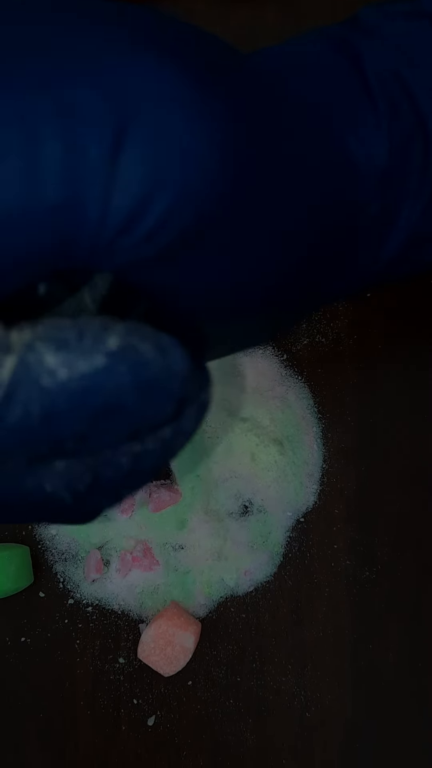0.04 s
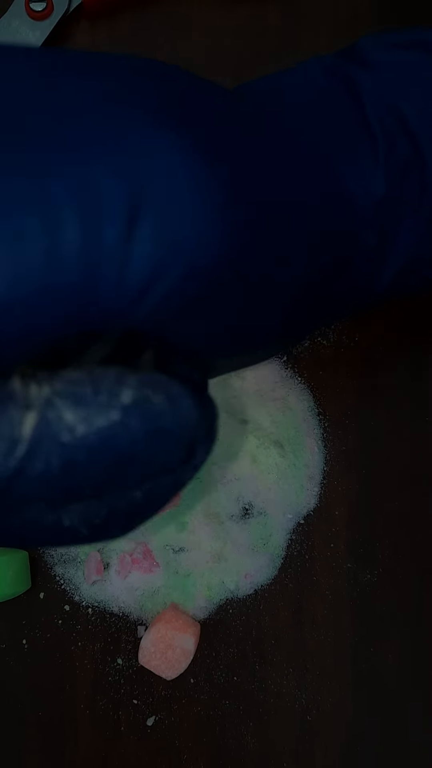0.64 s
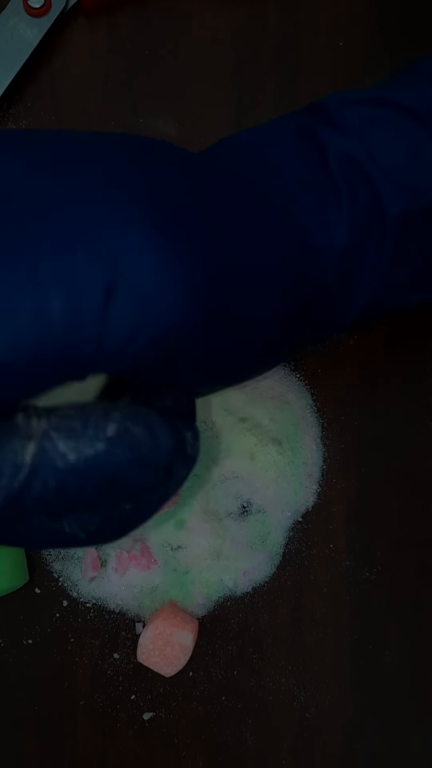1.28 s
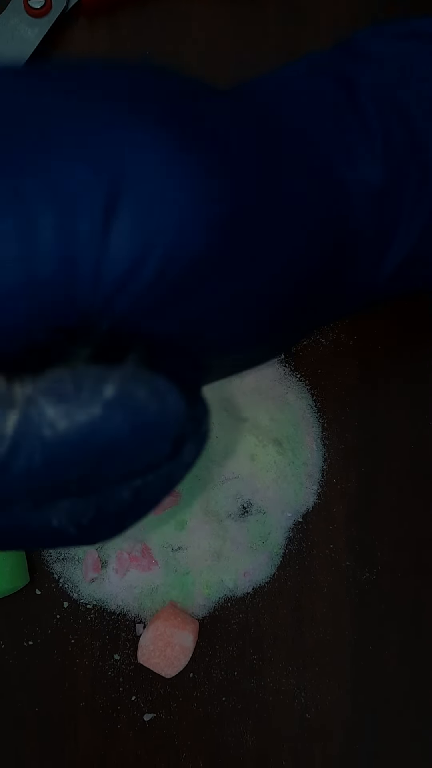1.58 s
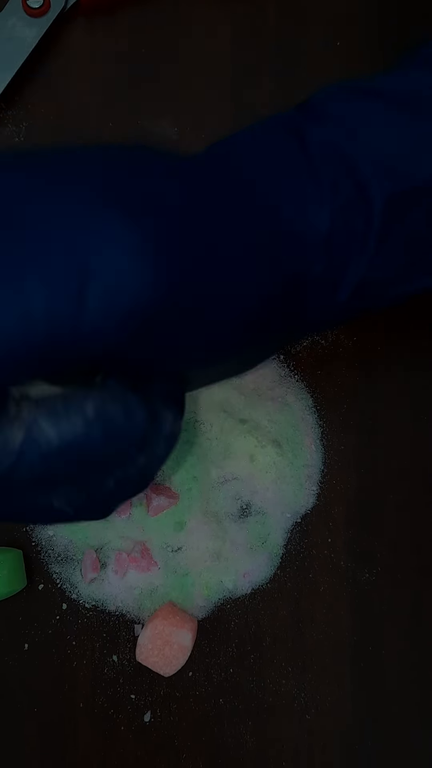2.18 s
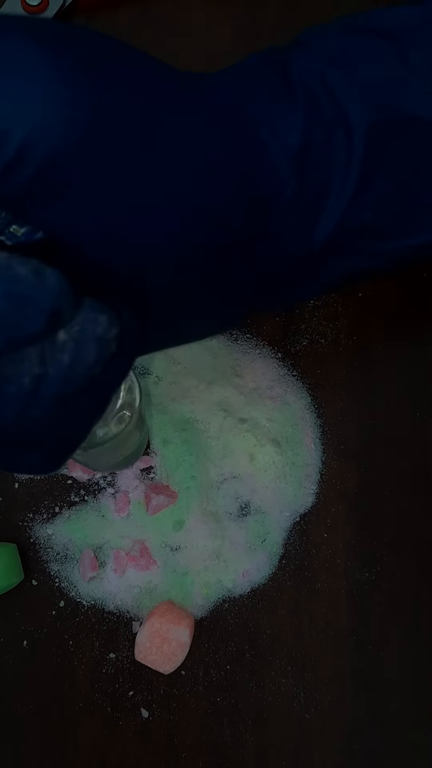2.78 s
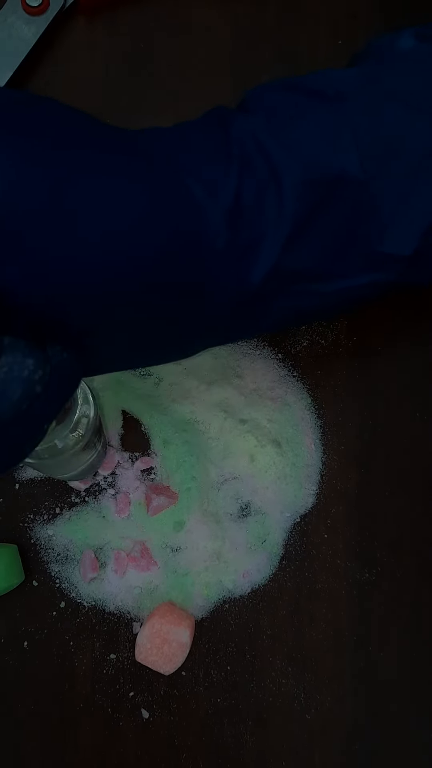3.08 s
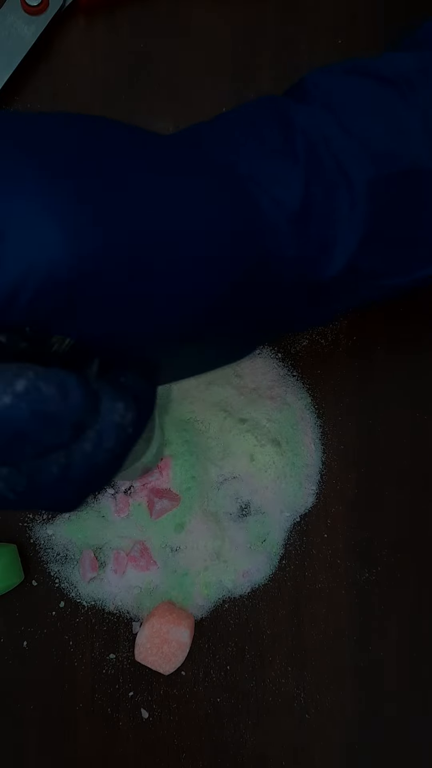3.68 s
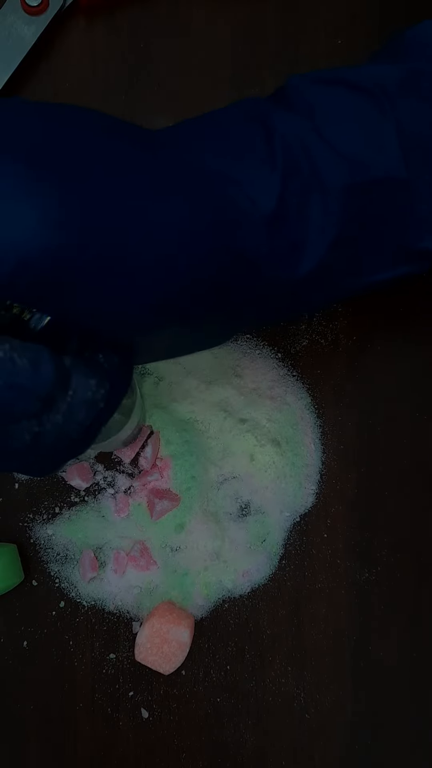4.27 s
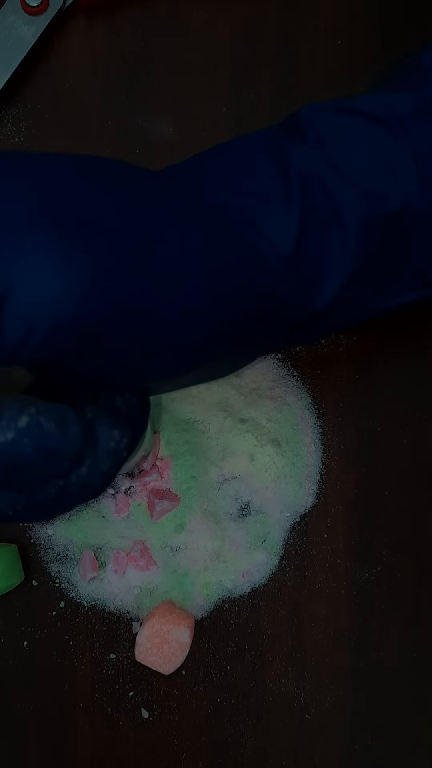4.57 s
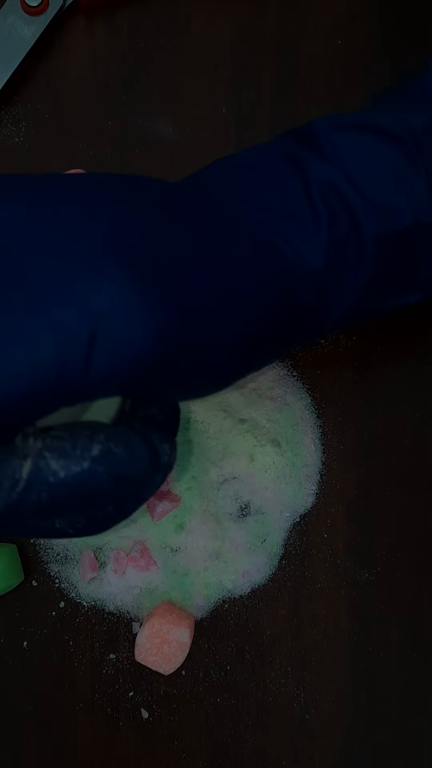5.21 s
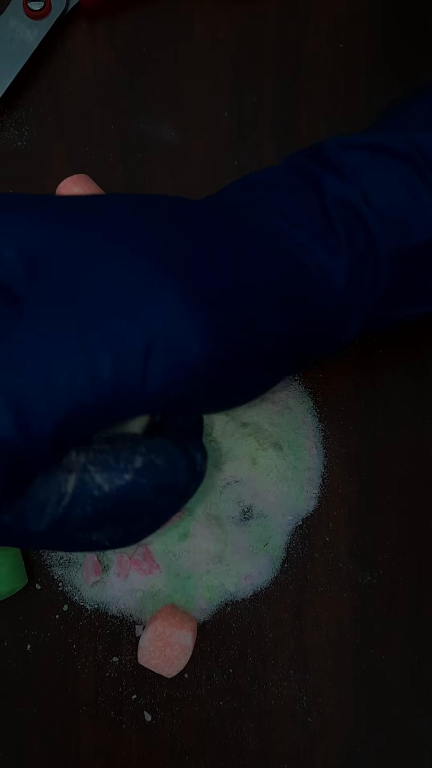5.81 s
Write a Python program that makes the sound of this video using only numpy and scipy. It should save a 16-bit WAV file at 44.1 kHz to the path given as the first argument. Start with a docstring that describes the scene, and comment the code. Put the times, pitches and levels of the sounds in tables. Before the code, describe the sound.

A small glass bottle pounds mothballs on a wooden table four times, then presses gently through the powder with soft grinding clicks.

```python
"""A small glass bottle, held in a gloved hand, pounds mothballs on a wooden table, close by.
Four hard blows clack and boom through the table top, each followed by rocking taps and snapping crumbs.
Then the glass is pressed gently through the powder five times, grinding and clicking on the wood.
The glove ticks on the bottle. A small room answers, over faint hiss and rumble."""
import sys
import numpy as np
from scipy import signal
from scipy.fft import rfft, irfft, next_fast_len
from scipy.io import wavfile
from scipy.ndimage import map_coordinates

SR = 44100
rng = np.random.default_rng(int(sys.argv[2]) if len(sys.argv) > 2 else 0)


def store_wav(level_fs):
    """Save 16-bit WAV to argv[1]."""
    pcm = np.round(np.clip(np.atleast_2d(level_fs), -1, 1) * 32767)
    wavfile.write(sys.argv[1], SR, pcm.T.astype(np.int16))


N = 257984


def amp(db):
    """Decibels to gain."""
    return 10 ** (np.asarray(db) / 20)


def unit(x):
    """Scale to rms 1."""
    return x / np.sqrt(np.mean(x ** 2) + 1e-20)


def along(points, hz):
    """Read (Hz, value) points on a log axis."""
    point_hz, values = np.transpose(points)
    return np.interp(np.log(hz + 1), np.log(point_hz + 1), values)


def pan(db):
    """Stereo gains for a left-over-right level."""
    return amp(np.array([[db], [-db]]) / 2)


def add(track, start_s, sound):
    """Mix a sound into a track."""
    start = max(round(start_s * SR), 0)
    part = sound[..., :N - start]
    track[..., start:start + part.shape[-1]] += part


def filtered(x, gain):
    """Apply a gain that depends on frequency."""
    n = x.shape[-1]
    size = next_fast_len(n + 2048)
    return irfft(rfft(x, size) * gain(np.fft.rfftfreq(size, 1 / SR)), size)[..., :n]


def coloured(x, points):
    """Zero-phase filter through (Hz, dB) points."""
    return filtered(x, lambda hz: amp(along(points, hz)))


def causal(x, points):
    """Minimum-phase filter through (Hz, dB) points: no sound ahead of the attack."""
    size = next_fast_len(x.shape[-1], real=True)
    gain = amp(along(points, np.fft.rfftfreq(size, 1 / SR)))
    cepstrum = irfft(np.log(gain), size)
    cepstrum[1:size // 2] *= 2
    cepstrum[size // 2 + 1:] = 0
    return irfft(rfft(x, size) * np.exp(rfft(cepstrum)), size)


def wobble(knots_per_s):
    """A smooth random curve."""
    return map_coordinates(rng.standard_normal(256), [np.arange(N) * knots_per_s / SR], mode="wrap")


# Diffuse field. Each row: frequency in Hz, left-right correlation.
COHERENCE = [(100, 0.92), (350, 0.72), (800, 0.23), (1800, 0), (5000, 0.016)]

def diffuse(size):
    """White stereo noise, alike in the bass and unrelated in the treble."""
    def mid_side_gains(hz):
        angle = np.arccos(along(COHERENCE, hz)) / 2
        return np.array([np.cos(angle), np.sin(angle)])
    mid, side = filtered(rng.standard_normal((2, size)), mid_side_gains)
    return np.array([mid + side, mid - side])


# Noise spectra. Each row: frequency in Hz, relative density in dB.
HISS_SPECTRUM = [(60, -14.5), (130, -8), (300, -4), (500, -7), (800, -1.5), (1300, -4), (2300, -4.5),
                 (4000, -10.5), (8000, -14), (10000, -14), (11600, -8), (14000, -13.5), (16000, -19)]
RUMBLE_SPECTRUM = [(20, -21.5), (40, -3.5), (58, -1.5), (80, -4.5), (108, -0.5), (150, -19), (300, -41)]
# Hiss drift. Each row: time in seconds, level in dB.
HISS_DRIFT = [(0, -61.5), (0.95, -64), (1.5, -62), (2.8, -65), (3.5, -64.5), (4.05, -61), (5.85, -62)]

def background(rumble_db=-72.5, swing_db=2, weight_db=-7.5, lag_s=0.026, width_s=0.036):
    """Drifting hiss over a restless rumble that swells under the arm's weight at each press."""
    t = np.arange(N) / SR
    hiss_db = np.interp(t, *np.transpose(HISS_DRIFT)) + 0.24
    restless = amp(rumble_db + swing_db * wobble(knots_per_s=2.5))
    weight = sum(amp(db + thump_db + weight_db) * np.exp(-((t - s - lag_s) / width_s) ** 2)
                 for s, db, thump_db, *_ in PRESSES)
    hiss = pan(1.5) * unit(coloured(diffuse(N), HISS_SPECTRUM))
    rumble = pan(6.5) * unit(coloured(diffuse(N), RUMBLE_SPECTRUM))
    return amp(hiss_db) * hiss + (restless + weight) * rumble


# Reverb colour. Each row: frequency in Hz, gain in dB.
ROOM_SPECTRUM = [(45, -12.5), (100, 5), (220, 7), (330, 3), (480, 4.5), (750, 0.5), (1150, -8), (1700, 3),
                 (2600, -2.5), (4000, -1.5), (7000, -4.5), (14000, -7)]
# Reverb decay. Each row: frequency in Hz, t60 in seconds.
ROOM_T60 = [(100, 0.32), (500, 0.36), (1500, 0.25), (4000, 0.3), (12000, 0.28)]

def room(x, gain_db=-0.5, near_db=4.5, wall_s=0.021, wall_db=5):
    """Nearby things scatter first; the walls answer a little later and die away."""
    out, size, step = np.zeros((2, N)), SR // 2, SR // 3
    t = np.arange(size) / SR
    scatter = amp(near_db) * np.minimum(t / 0.0016, 1)
    answer = 1 + amp(wall_db - 60 * np.abs(t - wall_s) / 0.067) / 2
    swell = np.where(t < wall_s, scatter, answer)
    for start in range(0, N, step):  # a fresh tail per block
        hz, frame_s, spectra = signal.stft(diffuse(size), SR, nperseg=256)
        decay = amp(-60 * frame_s / along(ROOM_T60, hz)[:, None])
        tail = signal.istft(spectra * decay, SR, nperseg=256)[1][:, :size] * swell
        tail = coloured(tail / np.linalg.norm(tail[0]), ROOM_SPECTRUM)
        add(out, start / SR, signal.fftconvolve(x[:, start:start + step], tail, axes=1))
    return amp(gain_db) * out


# Early reflections. Each row: delay in seconds, gain in dB.
WALL_ECHOES = [(0.018, -13), (0.027, -18)]
# Their colour. Each row: frequency in Hz, gain in dB.
WALL_SPECTRUM = [(90, -4.5), (200, 1), (400, 0), (1100, -8), (2000, -3), (8000, -9)]

def walls(x):
    """The nearest walls send back duller copies."""
    out = np.zeros((2, N))
    for delay_s, db in WALL_ECHOES:
        add(out, delay_s, amp(db) * x)
    return causal(np.pad(out, ((0, 0), (0, SR // 8))), WALL_SPECTRUM)[:, :N]


# Shifts of grip. Each row: start in seconds, level in dB.
GRIP_SHIFTS = [(0.027, -46.5), (0.146, -43.5), (0.578, -44.5), (0.584, -49.5), (0.606, -44.5), (0.672, -44),
               (1.655, -44), (1.985, -46.5), (2.633, -43.5), (4.214, -46.5)]

def glove(start_s=0.02, end_s=4.7, faint_db=-56, spread_db=2, count=16):
    """The glove ticks on the bottle: a few clear shifts of grip among many faint ones."""
    out = np.zeros((2, N))
    faint = [(start_s + (end_s - start_s) * (k + place) / count, faint_db + spread_db * (2 * size - 1))
             for k, (place, size) in enumerate(rng.random((count, 2)))]
    for s, db in GRIP_SHIFTS + faint:
        add(out, s, amp(db) * causal(clack(), [(450, 2), (1050, 2.5), (1700, 6.5), (3000, -4)]))
    return out


def grains(length_s, rate_per_s, spread_db):
    """A swell of tiny breaks of uneven size, rms 1."""
    size = round(length_s * SR)
    breaks = rng.random(SR // 4)[:size] < rate_per_s / SR
    strength = amp(spread_db * rng.standard_normal(SR // 4)[:size])
    sign = rng.choice([-1, 1], SR // 4)[:size]
    return unit(breaks * sign * strength * signal.windows.tukey(size, 0.5))


def grind(body, length_s):
    """Uneven little breaks drive a body's impulse response."""
    drive = grains(length_s, rate_per_s=460, spread_db=4)
    return signal.fftconvolve(drive[None], body / np.sqrt(np.sum(body ** 2) / 2), axes=1)


def crushes(delay_s=0.005, crush_s=0.046):
    """Crystal gives way at blows and presses: start, length in seconds; grind, fizz, rumble in dB."""
    sudden = [(s + delay_s, crush_s, db - 26, db - 34, db - 51.5) for s, db, *_ in BOTTLE_BLOWS]
    slow = [(s - lead_s, length_s, grind_db, grind_db - 14.5, grind_db - 4.5)
            for s, _, _, grind_db, lead_s, length_s in PRESSES]
    return sudden + slow


# Breaking crystal. Each row: frequency in Hz, relative level in dB.
CRACK_SPECTRUM = [(1500, -8), (3200, 4), (4500, 0), (6500, -0.5), (9000, -2), (12500, 1), (15000, -4),
                  (16500, -14)]

def snap(t60_s, rise_s=0.0004):
    """A short bright burst of fracture noise."""
    t = np.arange(SR // 20) / SR
    noise = unit(coloured(rng.standard_normal((2, len(t))), CRACK_SPECTRUM))
    return noise * (1 - np.exp(-t / rise_s)) * amp(-60 * t / t60_s)


def crumbs():
    """Collapsing grains grind under the glass and fizz in the air."""
    out = np.zeros((2, N))
    colour = [(100, -5), (400, -4.5), (800, 2), (1150, -5.5), (1800, 0), (3000, -2.5), (6000, -3)]
    for s, length_s, grind_db, fizz_db, _ in crushes():
        glass = causal(clack(), colour)
        add(out, s, amp(grind_db) * grind(glass, length_s))
        fizz = np.array([grains(length_s, rate_per_s=1800, spread_db=6) for _ in range(2)])
        add(out, s, amp(fizz_db) * pan(2.8) * unit(coloured(fizz, CRACK_SPECTRUM)))
    return out


# Larger splinters. Each row: start in seconds, relative level in dB.
LATE_SPLINTERS = [(0.4645, -30), (1.293, -30.5), (1.8706, -43), (2.4414, -38), (2.464, -40), (2.4947, -44),
                  (2.514, -34)]

def splinters(gain_db=-24, within_s=0.021, below_blow_db=24, spread_db=3, count=2):
    """Each blow throws off splinters at chance moments; others snap later on their own."""
    out = np.zeros((2, N))
    thrown = [(s + within_s * (k + rng.random()) / count,
               db - below_blow_db + spread_db * rng.standard_normal())
              for s, db, *_ in BOTTLE_BLOWS for k in range(count)]
    for s, db in thrown + LATE_SPLINTERS:
        crack = unit(coloured(snap(t60_s=0.014), [(3000, -20), (8000, -3), (11000, 5)]))
        add(out, s, amp(db + gain_db) * pan(5.7) * crack)
    return out


# Table top modes. Each row: frequency in Hz, relative level in dB, t60 in seconds.
TABLE_MODES = [(51.96, -43.5, 0.73), (96.6, -22.5, 0.33), (123.3, -20, 0.12), (171.8, -22.5, 0.19),
               (211, -25, 0.066), (264.8, -24.5, 0.18), (307.6, -21.5, 0.18), (347, -33.5, 0.22),
               (429.9, -32.5, 0.24), (457.8, -27, 0.28), (613.4, -17, 0.12), (915.7, -28, 0.1),
               (1084, -24, 0.026)]

def table_boom(rise_s=0.00079):
    """Each contact sets the table top ringing; grinding makes it rumble."""
    out = np.zeros(N)
    t = np.arange(SR // 2) / SR
    ring = sum((-1) ** k * amp(db - 60 * t / t60_s) * np.sin(2 * np.pi * hz * t)
               for k, (hz, db, t60_s) in enumerate(TABLE_MODES))
    ring *= 1 - np.exp(-t / rise_s)
    for s, db, thump_db, *_ in contacts():
        add(out, s, amp(db + thump_db + 14.5) * ring)
    shudder = causal(ring, [(60, -3.5), (100, 2.5), (160, -4), (500, -16.5)])
    for s, length_s, *_, rumble_db in crushes():
        add(out, s, amp(rumble_db) * grind(shudder[None], length_s)[0])
    return pan(3.5) * out


# Contact modes. Each row: frequency in Hz, level in dB, t60 in seconds before the cap, pan in dB.
CLACK_MODES = [(127.8, -16.5, 0.015, 6.5), (376, -14, 0.021, 2.5), (693, -7.5, 0.0067, 9.5),
               (1159, 1, 0.011, 7.5), (1448, -6, 0.012, 5.5), (1725, -7, 0.0061, -1.5),
               (2238, -12.5, 0.012, -4), (2865, -18, 0.0096, 1)]

def clack(scatter_db=1, detune=0.054, rise_cycles=0.34, max_t60_cycles=22, stagger_s=0.000081):
    """Glass on wood, damped by powder, a little different at each spot and to each side."""
    t = np.arange(SR // 16) / SR
    out = np.zeros((2, len(t)))
    for hz, db, t60_s, pan_db in CLACK_MODES:
        stereo_hz = hz * (1 + detune * rng.standard_normal((2, 1)))
        attack = 1 - np.exp(-t * hz / rise_cycles)
        decay = amp(-60 * t / min(t60_s, max_t60_cycles / hz))
        lag_s = stagger_s * rng.standard_normal()  # uneven contact starts the modes out of step
        gain = pan(pan_db) * amp(db + scatter_db * rng.standard_normal())
        out -= gain * attack * decay * np.sin(2 * np.pi * stereo_hz * (t - lag_s))
    return out


# Presses through the powder onto the wood. Each row: click time in seconds, level in dB,
# relative thump in dB, grind level in dB, grind lead in seconds, grind length in seconds.
PRESSES = [(3.102, -45.5, -18, -63, 0.0013, 0.046), (3.258, -26, -14.5, -51, 0.051, 0.14),
           (3.982, -18, -23, -46.5, 0.013, 0.017), (4.661, -39, -20, -63, 0.0018, 0.034),
           (5.079, -38, -14.5, -69, 0.0016, 0.065)]
# The glass rocks back. Each row: start in seconds, level in dB, relative thump and edge in dB.
ROCKING_TAPS = [(0.497, -39, -2.5, -16), (1.316, -28.5, -19.5, -24), (1.84, -31.5, -9, -10.5),
                (1.869, -24, -16, -15.5), (2.42, -28.5, -14, -3.5), (2.452, -32.5, -11, -6),
                (2.514, -30.5, -15, -11), (2.54, -28.5, -15.5, -22.5)]
# Hard blows. Each row: start in seconds, level in dB, relative thump, edge and crack in dB,
# delay until a lump splits in seconds, relative level of the split in dB.
BOTTLE_BLOWS = [(0.369, -4, -12.5, -14, -13.5, .026, -15), (1.193, -5.5, -9.5, -20.5, -18, .021, -11),
                (1.722, -2.5, -14.5, -26, -17, 0.017, -17), (2.271, -3, -15, -20.5, -17, 0.032, -25)]

def contacts(settle_s=0.02, settle_db=-47):
    """Glass meets crystal and table: start in seconds, level in dB, relative thump, edge, crack in dB."""
    hard_lump_db = (-15.5, 2.5, -5)  # thump, edge, crack
    cushioned_db = (-23.5, -26)  # edge, crack
    strikes = [blow[:5] for blow in BOTTLE_BLOWS]
    splits = [(s + delay_s, db + split_db, *hard_lump_db)
              for s, db, *_, delay_s, split_db in BOTTLE_BLOWS]
    taps = [(*tap, -15.5) for tap in ROCKING_TAPS]
    clicks = [(s, db, thump_db, *cushioned_db) for s, db, thump_db, *_ in PRESSES]
    # After each press the base settles flat.
    settles = [(s + settle_s, settle_db, -10.5, *cushioned_db) for s, *_ in PRESSES]
    return strikes + splits + taps + clicks + settles


def bottle(gain_db=1.5):
    """Each contact clacks and cracks the crystal: weight gives bass, hardness gives edge."""
    out = np.zeros((2, N))
    for s, db, thump_db, edge_db, crack_db in contacts():
        force = [(450, thump_db + 13.5), (1050, 0), (1700, 0),
                 (2700, edge_db + 19.5), (6000, edge_db + 4)]
        add(out, s, amp(db) * causal(clack(), force))
        add(out, s, amp(db + crack_db) * snap(t60_s=0.019))
    return amp(gain_db) * out


def scene():
    """The pounding, the room's answer and the background."""
    near = bottle() + crumbs() + splinters() + glove()
    direct = near + table_boom()
    return direct + walls(direct) + room(near) + background()


def record(dry, low_hz=48, top_hz=16300, ceiling=0.97):
    """The microphone drops the deepest bass, rounds off peaks and limits the band."""
    lean = signal.sosfilt(signal.butter(2, low_hz, "highpass", fs=SR, output="sos"), dry)
    rounded = lean / (1 + (lean / ceiling) ** 6) ** (1 / 6)
    return filtered(rounded, lambda hz: 1 / np.sqrt(1 + (hz / top_hz) ** 200))


dry = scene()
out = record(dry)
store_wav(out)
```